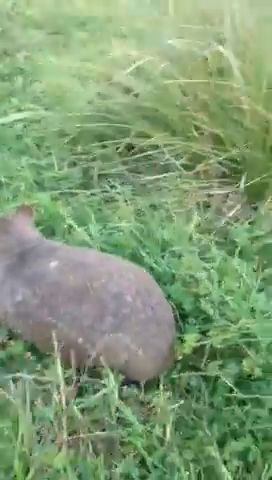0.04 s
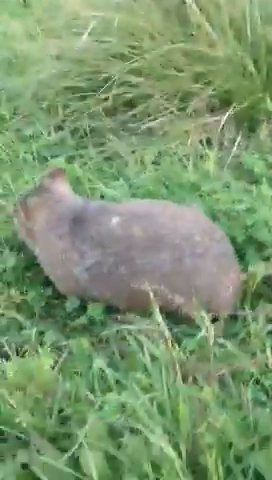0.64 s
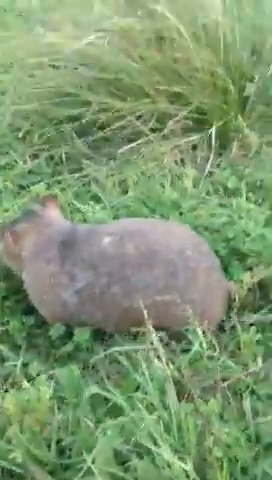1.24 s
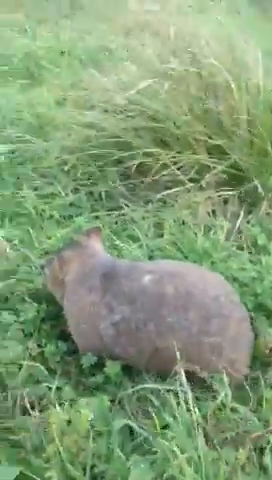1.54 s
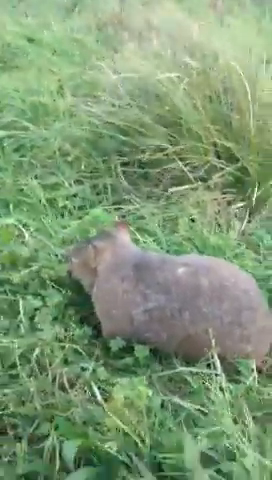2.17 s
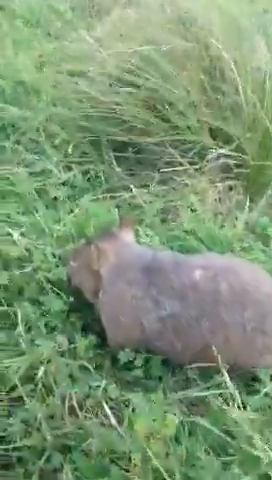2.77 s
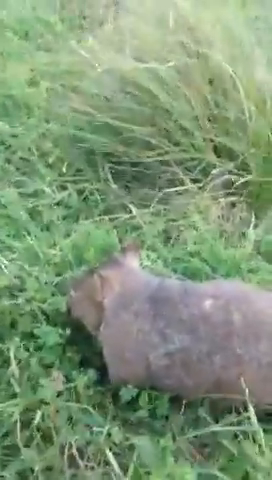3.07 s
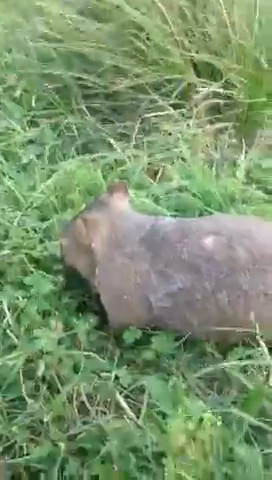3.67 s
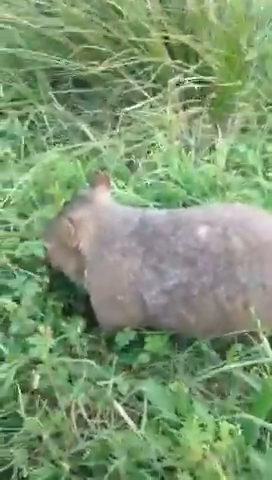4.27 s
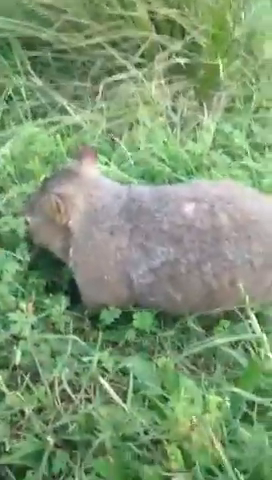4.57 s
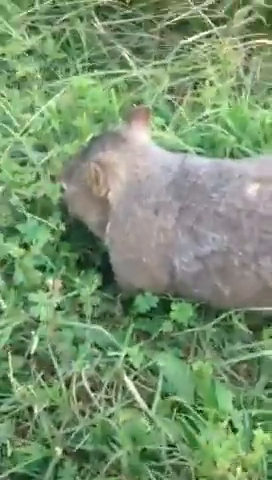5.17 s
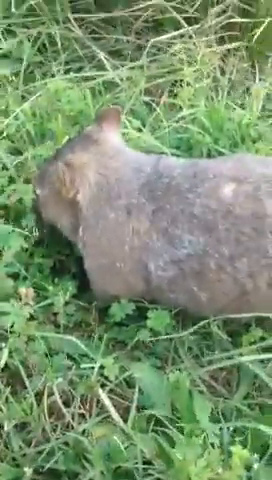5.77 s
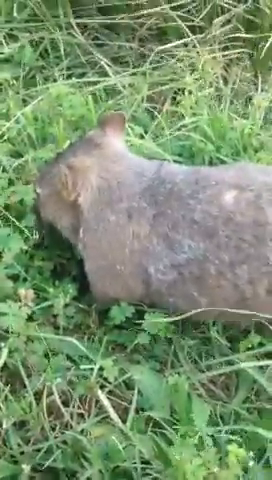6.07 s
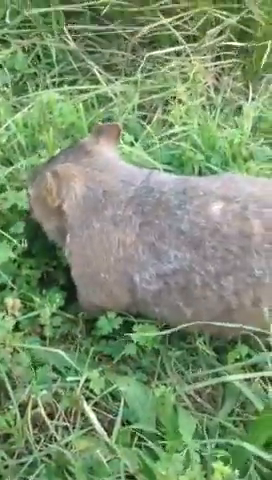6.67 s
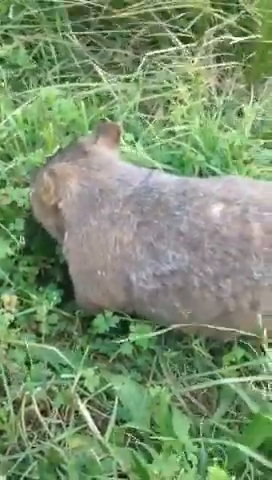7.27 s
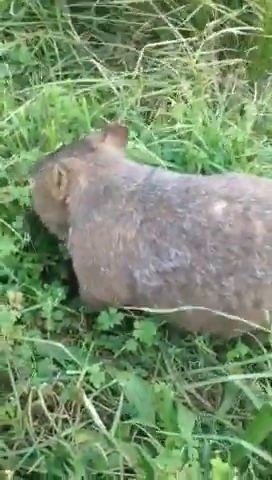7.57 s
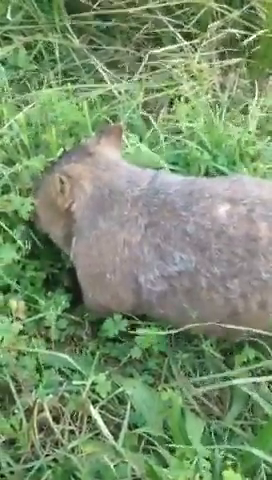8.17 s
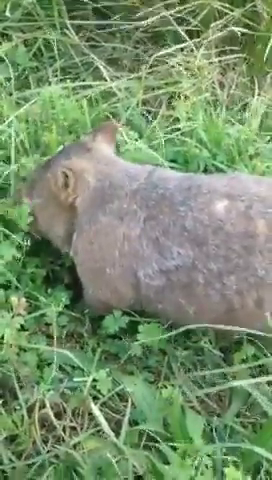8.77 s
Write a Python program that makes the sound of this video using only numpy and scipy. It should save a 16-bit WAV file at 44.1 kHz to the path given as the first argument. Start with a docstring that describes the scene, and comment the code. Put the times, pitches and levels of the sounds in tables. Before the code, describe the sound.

Gusty wind buffets a small hand-held microphone in an open meadow. A light breeze quickly turns into irregular low thumps and tearing crackles, with one hard, hollow-sounding gust about three seconds in. The wind eases briefly, then builds to a rough, nearly continuous finish. A faint hiss of grass and a dull murmur of the field lie behind it.

```python
"""Gusty wind buffets a small hand-held microphone over a meadow. It opens on a light breeze, a faint
hiss of grass and the murmur of the field. Gusts and eddies start crossing the microphone port at once:
slow ones thump, fast ones tear and crackle. Just before 3 s a hard gust makes the port ring hollow.
The wind eases around 4 s, then builds to a rough finish while the grass fades.
A limiter ducks everything after the hardest gusts."""
import sys
import numpy as np
from scipy import signal
from scipy.fft import rfft, irfft, next_fast_len
from scipy.io import wavfile
from scipy.ndimage import uniform_filter1d, minimum_filter1d

SR = 44100
rng = np.random.default_rng(int(sys.argv[2]) if len(sys.argv) > 2 else 0)


def transcribe(u):
    """Save the signal u as a 16-bit wav file named by the first command-line argument.

    u: samples, shape (n,) or (channels, n), limited to [-1, 1]; the rate is SR.
    q: integer samples, one column per channel.
    """
    v = np.clip(np.atleast_2d(u).T, -1, 1)
    q = np.round(v * 32767).astype(np.int16)
    wavfile.write(sys.argv[1], SR, q)


N = 393813

# the breeze bed under the gusts: time_s, speed_m_per_s, push_db
BREEZE = [(0.0, 0.56, 2.5), (0.2, 0.75, 3), (0.85, 0.57, -2.8), (1.02, 0.65, -2.3), (1.45, 0.59, -3),
          (1.7, 1, 3), (2.1, 0.67, -10.5), (2.45, 2.4, 0.5), (3.12, 1.06, 3.5), (3.5, 0.77, 2.0),
          (3.95, 0.88, -7.5), (4.15, 1.1, 10.5), (4.95, 2.01, 3), (5.5, 1.04, 1.5), (6.6, 2.32, 2.0),
          (7.48, 1.26, 5.5), (8.2, 2.16, 10), (8.93, 0.4, 0.5)]
# tone the port gives the buffeting: frequency_hz, gain_db
PORT_EQ = [(25, -12.5), (60, -11), (120, 1), (220, 1.5), (350, 1), (700, -0.5), (1400, -1), (3000, 0.5),
           (5000, 1.5), (7000, 1.5), (10000, -5.5), (15000, 3)]
# fader ride on the grass hiss, ahead of its trim: time_s, level_db
GRASS_RIDE = [(0, -65), (.35, -67.5), (.55, -64.5), (1.5, -66), (1.62, -70.5), (3.6, -70.5), (5.1, -66.5),
              (6, -69.5), (6.9, -70), (8.93, -74.5)]
# swells on top of that ride: peak_s, half_width_s, rise_db
GRASS_SWELLS = [(.13, .085, 6.5), (1.5, 0.032, 6), (2.55, 0.2, 7.5), (4.71, 0.21, 5.5), (6.15, 0.02, 10)]
# bright colour of the grass hiss: frequency_hz, gain_db
GRASS_EQ = [(500, -4), (2200, 8.5), (3000, 4.5), (4000, 4.5), (4650, 5.5), (5200, 1), (6500, 4),
            (8200, 4.5), (9700, -1.5), (11500, 0), (15000, 0)]
# dull colour of the far field: frequency_hz, gain_db
FIELD_EQ = [(30, -7.5), (150, -6), (400, 3.5), (800, 3), (1500, 1.5), (2200, -6.5), (3000, -18),
            (4600, -28), (5500, -37), (15000, -42)]
# gusts that sweep over the port: start_s, length_s, speed_m_per_s, push_db
GUSTS = [(0.087, 0.163, 0.96, 8), (0.291, 0.055, 0.64, 9), (0.373, 0.13, 0.51, 9),
         (0.493, 0.096, 2.04, -1.5), (0.702, 0.09, 0.88, 6.5), (0.803, 0.087, 1.21, 3.5),
         (1.144, 0.073, 1, 10.5), (1.216, 0.11, 1.72, 12), (1.558, 0.087, 1.31, 18.5),
         (1.711, 0.14, 1.34, 7.5), (1.863, 0.095, 1.66, 2), (2.011, 0.065, 1.16, 5.0),
         (2.117, 0.069, 1.26, 17), (2.142, 0.2, 2.5, 8), (2.203, 0.052, 3.5, 8.5), (2.324, 0.011, 6.5, -18),
         (2.345, 0.21, 6.57, 5), (2.56, 0.14, 3.9, 5.5), (2.757, 0.17, 4.35, 13), (2.769, 0.042, 10.4, -1),
         (2.855, 0.032, 5.2, 17), (2.934, 0.17, 4.14, 11.5), (3.176, 0.098, 0.92, 16.5),
         (3.264, 0.065, 4.93, 8), (3.367, 0.089, 2.1, 8.0), (3.461, 0.074, 4.23, 8.5),
         (3.57, 0.016, 0.48, 16.5), (3.627, 0.065, 1.9, 10.5), (3.709, 0.13, 1.64, -1.5),
         (3.876, 0.046, 0.62, 12.5), (3.964, 0.11, 0.5, 12.0), (4.086, 0.031, 2.48, 9.5),
         (4.134, 0.066, 2.65, 7.5), (4.223, 0.093, 0.95, 5.5), (4.389, 0.12, 0.96, 5.5),
         (4.539, 0.091, 1.22, 12), (4.664, 0.12, 2.7, -4.5), (4.798, 0.065, 3.75, 2.5),
         (4.881, 0.1, 2.75, 7.5), (4.985, 0.075, 3.03, 14), (5.073, 0.068, 3.87, 6),
         (5.185, 0.057, 0.4, 13.5), (5.239, 0.051, 2.23, 13.5), (5.337, 0.12, 1.44, 18),
         (5.494, 0.083, 2.3, 2), (5.589, 0.11, 2.26, 5), (5.727, 0.018, 1.97, 11.5),
         (5.786, 0.045, 1.1, 15.5), (5.838, 0.11, 1.98, 15), (5.983, 0.071, 3.4, 11.0),
         (6.079, 0.072, 0.76, 16.0), (6.165, 0.058, 0.9, 15), (6.231, 0.16, 2.7, 9.5),
         (6.398, 0.096, 1.4, 6.5), (6.485, 0.144, 3.9, 10.0), (6.504, 0.049, 7.8, 11),
         (6.637, 0.069, 4.9, 11.5), (6.739, 0.05, 5.4, 9.0), (6.863, 0.054, 0.81, 13),
         (6.974, 0.053, 2.7, 9.5), (7.044, 0.068, 3.47, 15), (7.139, 0.068, 1.9, 14.5),
         (7.219, 0.14, 2.4, 11.5), (7.262, 0.017, 3.8, 13), (7.386, 0.051, 3.4, 4),
         (7.518, 0.124, 1.91, 9.0), (7.603, 0.14, 3.45, 15), (7.608, 0.019, 8.3, 4),
         (7.753, 0.03, 1.15, 14.5), (7.802, 0.13, 2.95, 12.5), (7.965, 0.21, 3.36, 10.5),
         (8.195, 0.11, 2.7, 10), (8.338, 0.17, 2.55, 12), (8.379, 0.031, 3.53, 17.5),
         (8.462, 0.018, 5.9, 13.5), (8.506, 0.08, 4.36, 9.5), (8.595, 0.098, 4.15, 8.5),
         (8.693, 0.065, 1.9, 11), (8.744, 0.11, 3.3, 1), (8.863, 0.097, 2.57, 15)]
# single eddies that strike the port and pop: peak_s, speed_m_per_s, push_db
EDDIES = [(.117,1.5,6), (.134,1.8,4), (0.186,4.3,8), (.506,1.2,19), (.559,2.37,18), (.866,1.2,13),
          (1.261,0.44,24), (1.27,2.2,15), (1.613,3.14,19), (1.633,2.4,3), (1.765,0.98,13.5),
          (1.784,2.03,22.5), (1.859,3,4.5), (1.898,1.1,10.5), (1.914,1,13.5), (2.037,.73,10.5),
          (2.146,3,18), (2.17,4.3,15), (2.214,4.9,5), (2.404,5.1,11.5), (2.688,2.6,16), (2.767,3.6,9.5),
          (3.014,6.9,1.5), (3.084,9.9,16), (3.193,3.14,9), (3.279,3.6,17.5), (3.398,2.7,13.5), (3.656,4,14),
          (3.726,2.8,12), (3.821,3,8.5), (4.013,0.42,21), (4.189,2.5,18.5), (4.573,3.6,16.5),
          (4.687,2.1,16.5), (5.095,2.9,16.5), (5.272,2.3,17.5), (5.604,2.54,13), (5.734,1.57,18.5),
          (5.893,1.4,18), (6.004,1,11), (6.119,1.9,16), (6.137,2.9,15), (6.256,1.3,22), (6.286,3.4,11.5),
          (6.318,1.2,18), (6.353,4.8,3.5), (6.466,6.5,13), (6.953,1.9,10.5), (6.982,5.1,8), (7.058,4,21),
          (7.231,3.7,11.5), (7.28,5.6,7), (7.394,2.1,10.5), (7.669,6.5,8), (7.745,3.7,18),
          (7.836,4.14,14.5), (7.891,3.8,15.5), (8.006,1.8,17), (8.03,3.4,19.5), (8.062,2.4,24),
          (8.11,7.2,16), (8.169,4,11.5), (8.204,4.5,12), (8.243,4.5,17.5), (8.267,6.5,7), (8.369,4.8,7.5),
          (8.548,5.5,5.5), (8.623,7,4), (8.646,8.5,11.5), (8.814,1.2,16.5), (8.905,7.5,3), (8.921,7.5,3.5)]
# send to the port's hollow ring as one gust blows across it: time_s, send_gain
HOLLOW_SEND = [(2.74, 0.24), (2.78, 0.89), (2.88, 0), (2.94, 0.86), (3.01, 2), (3.06, 0)]

BUFFET_TRIM_DB, GRASS_TRIM_DB, FIELD_LEVEL_DB = -12.5, 9, -56.5
SWIRLS_PER_S, ROLL_OFF_HZ = 240, 196     # both at 1 m/s: faster air carries more and finer swirls


def from_db(db):
    """Decibels to gain."""
    return 10 ** (np.asarray(db) / 20)


def unit_power(x):
    """Scale to an RMS of one."""
    return x / np.sqrt(np.mean(x ** 2) + 1e-20)


def automation(rows):
    """One sample-by-sample curve for each column after the time."""
    times, *columns = np.transpose(rows)
    return [np.interp(np.arange(N) / SR, times, column) for column in columns]


def equalise(x, points):
    """Filter by an EQ curve of (frequency_hz, gain_db) points."""
    size = next_fast_len(N + SR // 10)
    hz, db = np.transpose(points)
    bins_hz = np.maximum(np.fft.rfftfreq(size, 1 / SR), 1)
    gain = from_db(np.interp(np.log(bins_hz), np.log(hz), db))
    return irfft(rfft(x, size) * gain, size)[:N]


def wobble(rate_hz):
    """Smooth random modulation of unit power that moves at about this rate."""
    pole = np.exp(-2 * np.pi * rate_hz / SR)
    smoothed = signal.lfilter([1], [1, -2 * pole, pole * pole], rng.standard_normal(N + SR))
    return unit_power(smoothed[SR:])


def bell(t, half_width):
    """A smooth hump of height 1, down to half at this distance from t = 0."""
    return .5 ** ((t / half_width) ** 2)


def airflow(flutter_db=1.3324, lumps_db=2.5):
    """Speed and push at the port: breeze, gusts and eddies add in energy; turbulence shakes the sum."""
    breeze_speed, breeze_db = automation(BREEZE)
    speed_energy, push_energy = breeze_speed ** 2, from_db(breeze_db) ** 2
    for span, envelope, speed, push_db in [*gusts(), *eddies()]:
        speed_energy[span] += speed ** 2 * envelope      # the speed lingers longer than the push
        push_energy[span] += (from_db(push_db) * envelope) ** 2
    flutter = from_db(flutter_db * wobble(rate_hz=260))
    lumps = from_db(lumps_db * wobble(rate_hz=64.5))
    speed = np.clip(np.sqrt(speed_energy) * flutter, 1 / 8, 16)
    return speed, np.sqrt(push_energy) * flutter * lumps


def swirls(speed, crowding=1.3, wash_db=-10, pop_db=23.5):
    """Crackle on a smooth wash: random pressure kicks of either sign, denser in fast air."""
    chance = SWIRLS_PER_S * speed ** crowding / SR
    wash = from_db(wash_db) * rng.standard_normal(N)
    kicks = (rng.random(N) < chance) * np.sign(rng.standard_normal(N)) / np.sqrt(chance)
    # the core of an eddy pops once, the harder the more it stands out of the wind
    peak_s, eddy_speed, _ = np.transpose(EDDIES)
    at = np.clip(peak_s * SR, 0, N - 1).astype(int)
    kicks[at] += from_db(pop_db) * eddy_speed / speed[at] * rng.choice([-1, 1], len(at))
    return kicks + wash


def buffeting(steepness=1.319):
    """Wind on the port: each kick is rounded to a swirl's crossing time, so fast air sounds brighter."""
    speed, push = airflow()
    size = next_fast_len(N + SR // 10)
    hz = np.fft.rfftfreq(size, 1 / SR)
    spectrum = rfft(swirls(speed) * push, size)
    half_octaves, pressure = 2 * np.log2(speed), np.zeros(N)
    for step in range(-6, 9):     # air speeds half an octave apart
        # viscosity damps the fine swirls about exponentially
        damping = np.exp(-(hz / (ROLL_OFF_HZ * 2 ** (step / 2))) ** steepness)
        crossfade = np.maximum(0, 1 - np.abs(half_octaves - step))
        pressure += irfft(spectrum * damping, size)[:N] * crossfade
    return from_db(BUFFET_TRIM_DB) * low_cut(equalise(pressure, PORT_EQ))


def low_cut(x, corner_hz=182.3, q=1):
    """The microphone's bass filter: every thump rings briefly near its corner."""
    omega = 2 * np.pi * corner_hz
    return signal.lfilter(*signal.bilinear([1, 0, 0], [1, omega / q, omega ** 2], SR), x)


def grass_hiss():
    """Grass in the wind: a faint, bright noise bed with a few swells."""
    t = np.arange(N) / SR
    ride_db, = automation(GRASS_RIDE)
    swell_db = sum(rise_db * bell(t - peak_s, width_s) for peak_s, width_s, rise_db in GRASS_SWELLS)
    hiss = unit_power(equalise(rng.standard_normal(N), GRASS_EQ))
    return from_db(GRASS_TRIM_DB + ride_db + swell_db) * hiss


def field_murmur():
    """The open field, far off: a steady bed of dull noise."""
    return from_db(FIELD_LEVEL_DB) * unit_power(equalise(rng.standard_normal(N), FIELD_EQ))


def gusts(attack_s=.01, release_s=.01, sag_db_per_s=0.5):
    """Each gust hits fast, holds almost level while it blows and dies away."""
    t = np.arange(N) / SR
    for start_s, length_s, speed, push_db in GUSTS:
        span = slice(*np.searchsorted(t, [start_s, start_s + length_s + 10 * release_s]))
        age = t[span] - start_s
        attack = np.clip(age / attack_s, 0, 1)
        release = np.exp(-np.maximum(age - length_s, 0) / release_s)
        yield span, attack * from_db(-sag_db_per_s * age) * release, speed, push_db


def eddies(rise_s=.0022, fall_s=.005):
    """Each eddy is a short jab of air that arrives faster than it leaves."""
    t = np.arange(N) / SR
    for peak_s, speed, push_db in EDDIES:
        span = slice(*np.searchsorted(t, [peak_s - 10 * rise_s, peak_s + 10 * fall_s]))
        half_width_s = np.where(t[span] < peak_s, rise_s, fall_s)
        yield span, bell(t[span] - peak_s, half_width_s), speed, push_db


def hollow_ring(wind, pitch_hz=970, q=1.08):
    """The port's cavity rings broadly while air grazes the opening."""
    send, = automation(HOLLOW_SEND)
    return send * signal.lfilter(*signal.iirpeak(pitch_hz, q, fs=SR), wind)


def limiter(x, ceiling=0.68, release_db_per_s=32):
    """Ducks the mix just ahead of each peak over the ceiling and lets it back up slowly."""
    over_db = 20 * np.log10(np.maximum(np.abs(x) / ceiling, 1))
    recovery_db = release_db_per_s * np.arange(N) / SR
    gain_db = recovery_db - np.maximum.accumulate(over_db + recovery_db, axis=-1)
    look_ahead = SR // 500     # 2 ms
    held_db = minimum_filter1d(gain_db, size=look_ahead)
    return x * from_db(uniform_filter1d(held_db, size=look_ahead))


def scene():
    """Mono mix: wind on the port up front, grass and field behind."""
    wind = buffeting()
    return (wind + hollow_ring(wind) + grass_hiss() + field_murmur())[None]


def record(dry, cutoff_hz=15500):
    """Output chain: the limiter, then a steep high cut."""
    high_cut = signal.ellip(12, .1, 90, cutoff_hz, fs=SR, output="sos")
    return signal.sosfilt(high_cut, limiter(dry))


dry = scene()
out = record(dry)
transcribe(out)
```